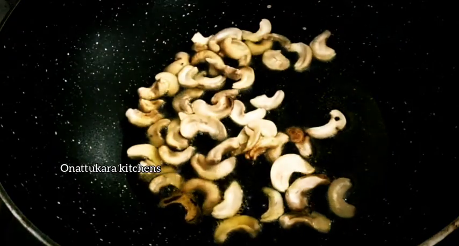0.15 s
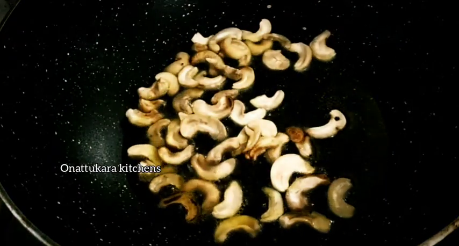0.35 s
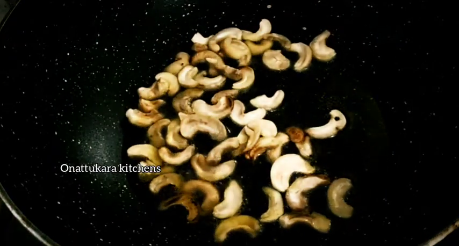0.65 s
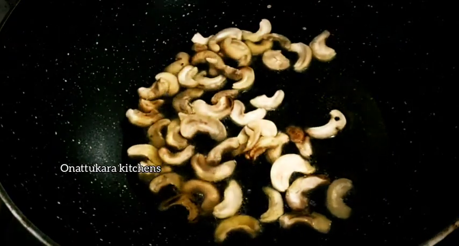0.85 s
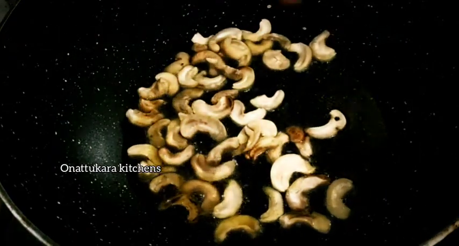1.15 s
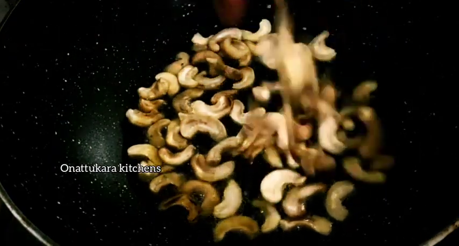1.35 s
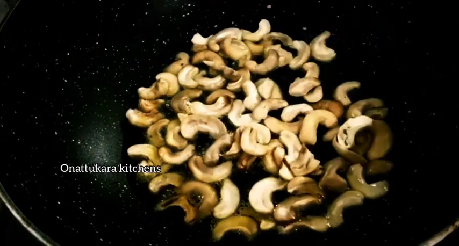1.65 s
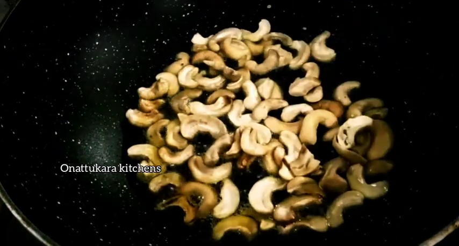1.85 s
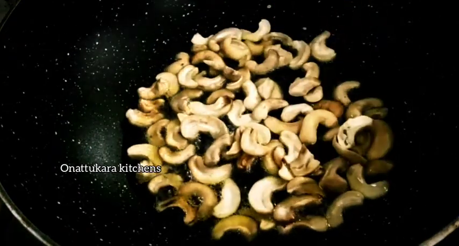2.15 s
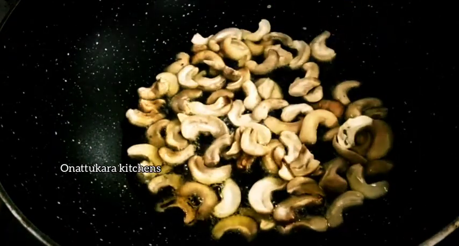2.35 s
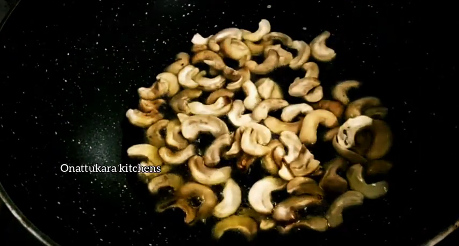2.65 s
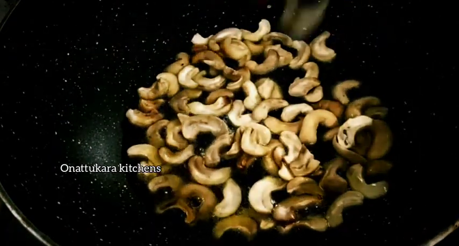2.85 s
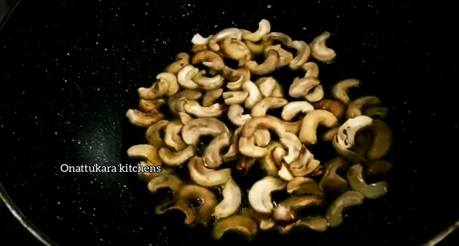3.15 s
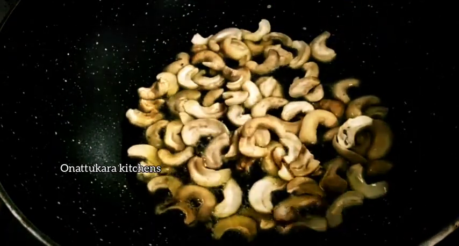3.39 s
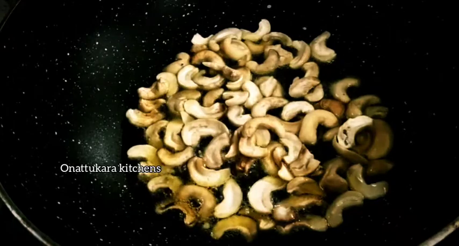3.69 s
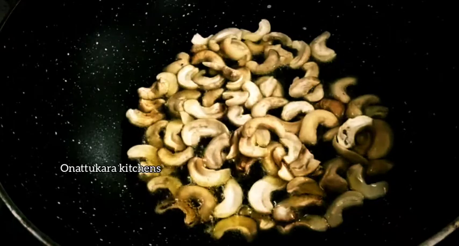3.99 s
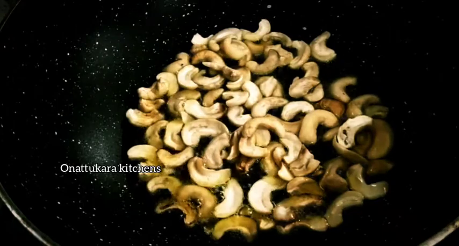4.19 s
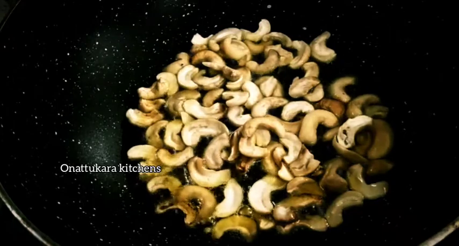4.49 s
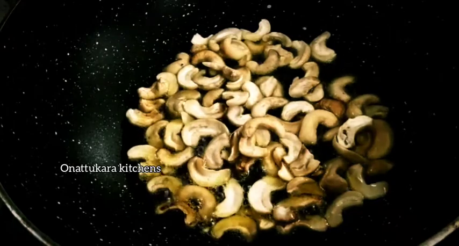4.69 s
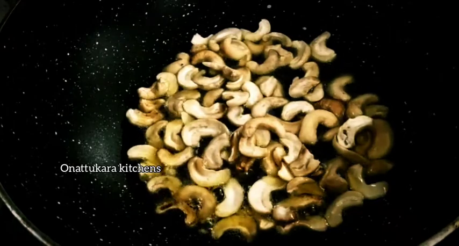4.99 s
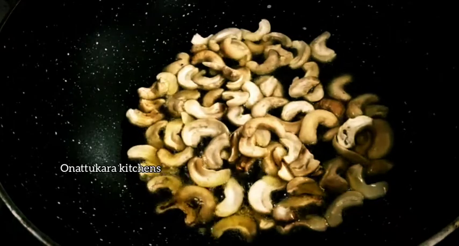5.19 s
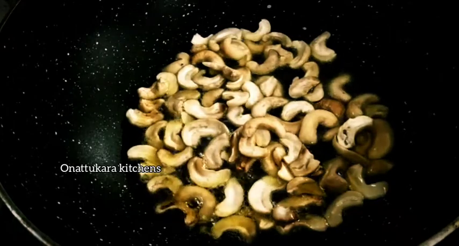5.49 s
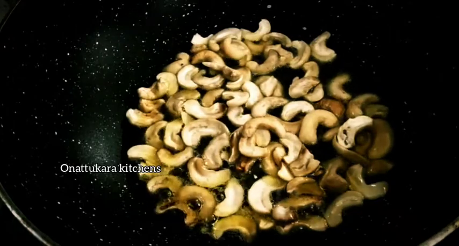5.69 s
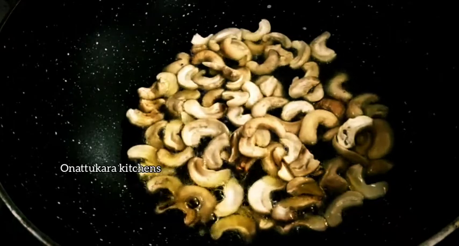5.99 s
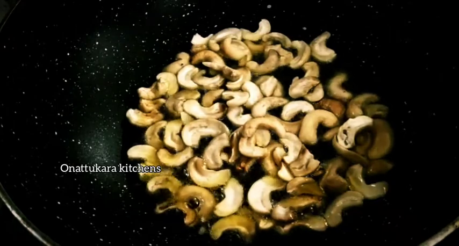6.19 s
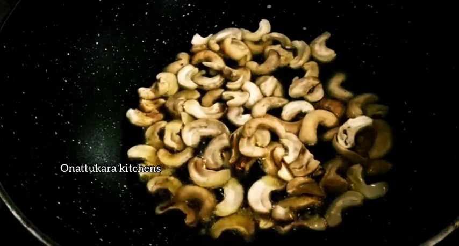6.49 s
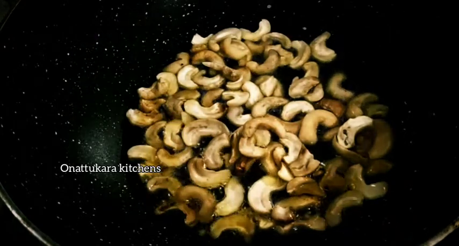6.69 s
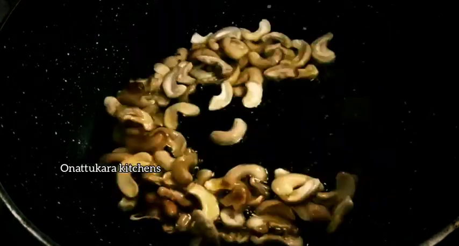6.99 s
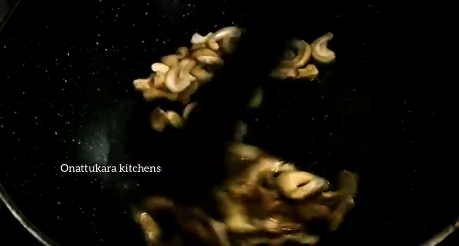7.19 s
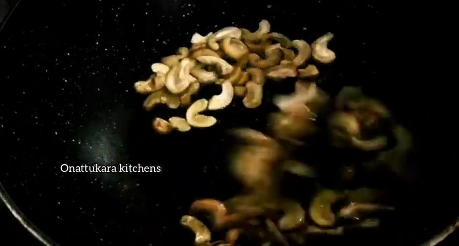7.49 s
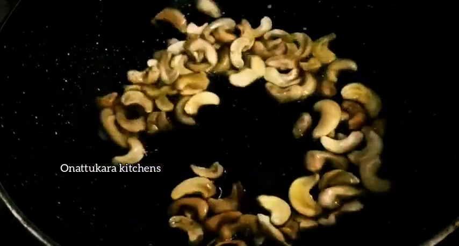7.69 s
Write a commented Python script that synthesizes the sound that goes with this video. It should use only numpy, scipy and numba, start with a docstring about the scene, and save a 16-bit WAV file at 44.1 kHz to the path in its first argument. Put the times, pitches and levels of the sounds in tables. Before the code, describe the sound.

Cashews sizzle and crackle steadily in hot fat, a fresh handful patters in, utensils clatter nearby, then a spatula knocks the pan and stirs.

```python
"""Cashews fry in ghee in a nonstick pan, heard from close above in a small, hard kitchen through a phone microphone.
Steam bubbles burst in the fat as damped tones: fine fizz, coarser crackle and single pops, with rough sputters.
A fresh handful drops in and the fizz flares; later a spatula knocks on the pan and turns the nuts.
Metal utensils clatter beside the stove: runs of tiny contacts that excite ringing modes."""
import sys
import numpy as np
from scipy import signal
from scipy.fft import rfft, irfft
from scipy.io import wavfile
from scipy.ndimage import uniform_filter1d
from numba import njit

SR = 44100
rng = np.random.default_rng(int(sys.argv[2]) if len(sys.argv) > 2 else 0)


def int16_out(signal):
    """Quantize to a 16-bit WAV file."""
    q = np.round(np.clip(np.atleast_2d(signal).T, -1, 1) * 32767)
    wavfile.write(sys.argv[1], SR, q.astype(np.int16))


N = 346185
TIME = np.arange(N) / SR

# wet surfaces meet hot fat as nuts drop in or are turned; both changes are scaled by a swell that stays below 1:
# (time [s], crackle change [dB], fizz change [dB], time for the fizz to subside [s])
FLARES = [(-0.12, -6, 9, 0.16), (1.21, 12, 16, 0.37), (6.82, -4, 7, 1.14), (7.33, 23, 6.5, 1.7)]
FLARE_RISE_S = 0.11  # for the fizz
CRACKLE_SLOWNESS = 6.3  # the crackle swells and subsides this many times slower
# the fat left to itself: levels at the start, sinking as the nuts dry
CRACKLE_DB, CRACKLE_DRYING_DB_PER_S = -48, 0.58
FIZZ_DB, FIZZ_DRYING_DB_PER_S = -42, 0.74
# spectra of crackle and fizz: (frequency [Hz], gain [dB])
CRACKLE_COLOUR = [(50, -53), (150, -53), (260, -4.5), (480, -10), (620, 1.5), (900, -1), (1100, -2.5),
                  (1400, 1.5), (2200, 4.5), (3500, 0), (6000, 13)]
FIZZ_COLOUR = [(80, -57.5), (400, -9.5), (1500, -1), (3000, -3.5), (5000, -5.5), (6600, 0), (7800, 3),
               (15000, 13.5)]

# the loudest bursting bubbles, before trim and colour: (time [s], level [dB], pitch [Hz], decay [ms])
POPS = [(0.022, -24, 6500, .8), (0.0565, -25, 6460, .6), (0.0722, -25, 6720, .5), (0.1177, -25, 3870, .3),
        (0.1533, -25, 2410, .7), (0.262, -27, 7230, .5), (0.3035, -26, 4560, .6), (0.335, -27, 3150, .85),
        (0.443, -23.5, 5700, .8), (0.5051, -23, 4220, .6), (0.543, -32, 1590, 1.5), (0.5445, -22, 6460, .5),
        (0.604, -27.5, 3200, 1.2), (0.6425, -26, 6000, 1.1), (0.692, -30, 1360, 1.1),
        (0.736, -23, 6030, .6), (0.8415, -25, 6890, .7), (0.9392, -26, 3360, .8), (0.979, -30, 1280, 2.2),
        (1.0312, -24, 6600, .9), (1.063, -25, 6800, .5), (1.0788, -25.5, 3120, .77), (1.11, -31, 1370, 2.2),
        (1.2557, -25, 6900, 1.3), (1.338, -23.5, 7000, .8), (1.4675, -22, 3260, 1.1),
        (1.474, -26, 2950, 1.6), (1.597, -24, 4300, .8), (1.7386, -25, 7050, .7), (1.8017, -22, 6720, .6),
        (1.841, -23.5, 4400, .9), (1.861, -23, 3500, .3), (1.8843, -24, 3800, .95), (1.9465, -24, 2070, .9),
        (2.0395, -24, 6530, .6), (2.1388, -24, 2500, .6), (2.3239, -26, 2150, .7), (2.383, -25, 1980, 1.2),
        (2.4266, -24, 3870, .4), (2.4373, -24, 3700, 1.2), (2.4793, -25.5, 2020, 2.1),
        (2.6176, -24, 1840, 1.9), (2.6888, -24, 1380, 1.3), (2.7108, -25, 5600, .5),
        (2.7248, -25, 1890, 2.5), (2.764, -26, 6580, 1.3), (2.7858, -22, 7300, 1), (2.8066, -27, 1980, 1.5),
        (2.815, -25.5, 2030, 2.5), (2.9102, -23, 6030, .5), (3.0222, -19, 2630, 1),
        (3.077, -19.5, 1700, .9), (3.1642, -25, 1940, 1.4), (3.1918, -26, 4270, .8),
        (3.254, -26, 2200, 2.2), (3.348, -14.5, 1760, 1.2), (3.4575, -26, 1980, 1), (3.505, -23, 4130, 1),
        (3.5402, -23, 4650, .5), (3.571, -24, 1840, .97), (3.6171, -25, 3870, .6), (3.6493, -23, 3780, .4),
        (4.0433, -23, 6370, .5), (4.129, -22, 2650, .9), (4.2926, -26, 4910, .7), (4.3483, -24.5, 3440, .6),
        (4.3781, -29, 1890, 2.2), (4.4996, -27, 2070, 1.4), (4.5907, -25, 4150, .5),
        (4.7303, -26, 7320, .7), (4.7879, -26, 2320, .6), (4.8194, -25, 1750, 2), (5.2776, -23.5, 4080, .6),
        (5.3702, -24.5, 7660, .6), (5.4131, -28, 7230, .7), (5.4485, -22, 2150, .8),
        (5.4558, -25, 2320, .6), (5.511, -23.5, 3760, .6), (5.5626, -26, 7580, .5),
        (5.678, -23.5, 6500, .25), (5.7302, -19.5, 4600, .6), (5.7751, -25, 7410, .3),
        (5.8743, -26, 5080, .5), (5.9393, -26.5, 1810, .8), (6.02, -25, 3500, .25), (6.1712, -21, 2770, .6),
        (6.2842, -21.5, 3470, .4), (6.3179, -25, 2580, .8), (6.4474, -22.5, 2390, .8),
        (6.5529, -24, 4560, .5), (6.8819, -26, 4220, .8), (7.0333, -21, 4700, 1.3), (7.0975, -26, 5850, .7),
        (7.184, -23, 4200, .9), (7.199, -21, 4400, .7), (7.2115, -25, 3870, 1.6), (7.3082, -21.5, 5070, .8),
        (7.4163, -20, 6000, .7), (7.5554, -24, 7260, .8), (7.579, -21, 3500, .25),
        (7.622, -21.5, 7300, 1.1), (7.697, -22, 3850, 1.7), (7.7124, -21, 5340, .7), (7.738, -23, 3790, .6)]
# spectrum of the pops: (frequency [Hz], gain [dB])
POP_COLOUR = [(50, -30), (200, -25), (650, 0), (8000, 0), (12000, 7)]
POP_TRIM_DB = -.9
# lesser pops at random: level above the crackle, range of pitch, typical decay
STRAY_DB, STRAY_SPREAD_DB = 14.5, 4
STRAY_LOW_HZ, STRAY_HIGH_HZ, STRAY_DECAY_MS = 2400, 7000, .55

# nuts pattering down and the spatula's edge tapping, before the low cut:
# (time [s], level [dB], pitch [Hz], decay [ms])
CLACKS = [(1.2045, -33, 870, 5.3), (1.244, -28, 1580, 2.6), (1.258, -28, 980, 4.3), (1.333, -31, 960, 7.6),
          (1.355, -30, 970, 4), (6.6895, -26.5, 990, 2.3)]
# nuts landing and the spatula striking the pan: (time [s], peak level [dB], contact brightness [Hz])
KNOCKS = [(1.206, -39, 600), (1.217, -26, 6000), (1.232, -38, 400), (6.689, -23, 826), (6.76, -26.5, 450),
          (7.0392, -13, 1870), (7.149, -23, 1030), (7.388, -31, 2500), (7.394, -35.5, 130),
          (7.445, -36.5, 200)]
# modes of the pan: (frequency [Hz], level [dB], t60 [s])
PAN_MODES = [(161, -17, .35), (232, -12, .45), (258, -8, .8), (267, -8, .8), (328, -4.5, .55),
             (413, -14, .3), (554, -15, .3), (625, -2, .55), (745, -10, .55), (795, -6, .5), (831, -7, .5),
             (908, -8, .5), (965, -6, .55), (1017, -3, .6), (1160, -12, .4), (1367, -9, .35),
             (1520, -11, .35), (1920, -7, .35), (2140, -11, .3)]
# spectrum of a blow on the pan: (frequency [Hz], gain [dB])
THUD_COLOUR = [(30, -52), (60, -22), (130, -12.5), (250, -4.5), (500, 3.5), (750, 1), (1000, -3.5),
               (1400, 5.5), (2000, -5), (2800, -18), (6000, -5)]
# hollow note of a blow, and the pan's ringing; levels relative to the thud
BLOW_HZ, BLOW_T60_S, BLOW_DB, PAN_RING_DB = 850, .028, -2.5, -2.5
# spatula and nuts sliding over the pan floor: (time [s], level [dB], pitch [Hz], length [s])
SLIDES = [(1.218, -37, 2100, 0.0089), (1.25, -48, 970, 0.12), (6.689, -42, 310, 0.03),
          (6.73, -44, 342, 0.09), (6.689, -42, 1970, 0.021), (6.75, -45.5, 2130, 0.031),
          (7.05, -45, 990, 0.17), (7.186, -42, 4230, .022), (7.21, -51.5, 263, 0.13),
          (7.362, -45.5, 2330, 0.029)]
# short rough sputters around one pitch, and the lingering tail of the loudest pop:
# (time [s], level [dB], pitch [Hz], length [s])
SPUTTERS = [(2.275, -46, 2270, 0.027), (2.388, -45, 1900, 0.018), (2.69, -47, 1393, 0.013),
            (2.728, -59, 2090, 0.0051), (2.90, -43.5, 920, .028), (3.078, -40, 1330, 0.0083),
            (3.349, -48, 1430, 0.13), (4.819, -39.5, 1610, 0.026), (4.863, -39, 1570, 0.0087),
            (5.449, -47.5, 1558, 0.021), (5.836, -41, 1530, 0.028), (6.228, -39, 864, 0.0091)]

# utensils beside the stove collide in short runs and settle in longer, faint ones, before gain and colour:
# (time [s], level [dB], length, at most half a second [s], treble [dB], low cut [Hz])
CLATTERS = [(3.71, -37.5, 0.011, 3, 300), (3.722, -30, 0.017, -17, 220), (3.738, -34.5, .014, -16, 250),
            (3.766, -52.5, 0.33, 7, 300), (4.463, -37, 0.016, -10, 300), (4.488, -52.5, .74, -0.5, 400),
            (4.873, -33, 0.014, 6, 60), (4.886, -37.5, 0.031, 2, 60), (4.91, -32.5, 0.03, -2, 90),
            (4.946, -29, 0.0089, -0.5, 200), (4.961, -32.5, 0.024, -2, 200), (5.0, -42.5, .16, -5, 500)]
# modes of the utensils: (frequency [Hz], level [dB], t60 [s])
UTENSIL_MODES = [(158, -9, .6), (385, -8, .4), (415, -6, .55), (470, -7, .4), (628, -11, .4), (791, -4, .6),
                 (1066, -4, .45), (1166, -7, .45), (1513, 0, .6), (1831, -4, .6), (2519, -2, .5),
                 (2902, -1, .5), (3480, -1, .6), (3682, 0, .55), (4705, -2, .4), (5410, -1, .45),
                 (6175, -2, .4), (7117, 3, .35), (7400, 2, .35), (7670, 3, .3), (7838, 2, .3),
                 (8710, 9, .5), (9690, 7, .4), (12900, 10, .2), (14900, 10, .25)]
# modes of the worktop under them: (frequency [Hz], level [dB], t60 [s])
WORKTOP_MODES = [(158, -4.5, 0.51), (190, -5, 0.25)]
WORKTOP_DB = -32
# spectrum of the clatter: (frequency [Hz], gain [dB])
CLATTER_COLOUR = [(30, -26), (110, -26), (160, -9.5), (200, -12), (245, -5), (320, -5.5), (400, 0),
                  (470, -1), (520, -3), (640, -1), (850, -4.5), (1120, -2), (1330, -1.5), (1550, -3.5),
                  (2300, -7), (8000, -10), (15000, -16)]
# nudges of the bowl: (time [s], peak level [dB])
BOWL_TAPS = [(3.725, -39), (4.465, -36)]
# modes of a steel bowl, before a linear fade over one second: (frequency [Hz], level [dB], t60 [s])
BOWL_MODES = [(377, -10, .8), (1071, 0, 1.5), (1168, -6, 1.5), (1480, -9, 1.5), (1809, -7, 1.6),
              (2649, -7, 1.4), (3456, -3, 2.2)]
# short pitched rattles within the clatter: (time [s], level [dB], pitch [Hz], length [s])
PITCHED_RATTLES = [(3.73, -47.5, 1130, 0.077), (3.74, -40.5, 637, 0.014), (4.465, -45.5, 654, 0.022),
                   (4.876, -40, 399, 0.028)]

# spectrum of the quiet kitchen: (frequency [Hz], gain [dB])
KITCHEN_COLOUR = [(25, -24), (50, -9), (80, 0), (110, -2.5), (200, -6.5), (300, 3), (1000, -7),
                  (15000, -36)]
# response of the microphone: (frequency [Hz], gain [dB])
MICROPHONE = [(20, -6.5), (7700, 4), (8300, -2), (9000, -8.5), (10300, -17.5), (12000, -25.5), (15500, -26)]
TOP_HZ = 15700  # upper edge of the recorded band


def undb(db):
    """Amplitude of a level in dB."""
    return 10 ** (np.asarray(db) / 20)


def unit(x):
    """Scale to rms 1."""
    return x / np.sqrt(np.mean(x ** 2))


def add(track, s, sound):
    """Mix a sound into a track at time s."""
    i = int(s * SR)
    track[i:i + len(sound)] += sound[:N - i]


def colour(x, points, size=4096):
    """Causal filter with the given (Hz, dB) spectrum, built from its cepstrum."""
    hz, db = np.transpose(points)
    bins = np.maximum(np.arange(size // 2 + 1) * SR / size, 1)
    gain_db = np.interp(np.log(bins), np.log(hz), db)
    cepstrum = irfft(np.log(undb(gain_db)))
    # folding the cepstrum forward in time makes the filter minimum-phase
    cepstrum[1:size // 2] *= 2
    cepstrum[size // 2 + 1:] = 0
    impulse = irfft(np.exp(rfft(cepstrum)))
    return signal.fftconvolve(x, impulse)[:len(x)]


def lowpass(x, hz):
    """Gentle two-pole low-pass."""
    return signal.sosfilt(signal.butter(2, min(hz, SR / 2 - 1), fs=SR, output="sos"), x)


def fade(t, t60):
    """Exponential decay, 60 dB in t60 seconds."""
    return np.exp(-np.log(1000) * t / t60)


def ring(modes):
    """One second of an object's free ringing, with unit energy."""
    t = TIME[:SR]
    y = np.zeros(SR)
    for hz, db, t60 in modes:
        y += undb(db) * fade(t, t60) * np.sin(2 * np.pi * (hz * t + rng.random()))
    return y / np.sqrt(np.sum(y ** 2))


@njit
def bubbles(when, size, hz, decay, snap):
    """Each bubble is a snap of its film and a damped tone of its cavity."""
    out = np.zeros(N)
    for k in range(len(when)):
        start = int(when[k] * SR)
        # z is a decaying phasor, turned by p at each sample
        z, p = size[k] + 0j, np.exp((2j * np.pi * hz[k] - 1 / decay[k]) / SR)
        for i in range(max(start, 0), min(N, start + int(6 * decay[k] * SR))):
            out[i] += z.imag + (snap[k] * size[k] if i == start else 0.)
            z *= p
    return out


def burst(when, size, hz, decay, snap):
    """Bubbles and their echoes off the pan wall, whose delay depends on where each one sits."""
    lag = 0.000965 + .004 * rng.random(len(when))
    direct = bubbles(when, size, hz, decay, snap)
    return direct + undb(-10) * bubbles(when + lag, size, hz, decay, snap)


def swarm(count, low_hz, high_hz, spread_db, cap_db, cycles, snap):
    """Bubbles at random moments: many tiny, few large, each ringing for a few cycles."""
    when, pitch, rank, damping, film = rng.random((count, 5)).T
    hz = low_hz * (high_hz / low_hz) ** pitch
    size = undb(-spread_db * np.log(1 - rank))
    size /= np.hypot(1, size / undb(cap_db))  # a shallow film of fat limits how large they grow
    decay = cycles * 2 ** (2 * damping - 1) / hz
    size /= np.sqrt(decay / decay.mean())  # shorter tones start stronger
    return burst(when * N / SR, size, hz, decay, snap * (.5 + 2 * film))


def surge(rate):
    """Random levels held 1 / rate s and smoothed; spread near 1."""
    hold = int(SR / rate)
    steps = np.repeat(rng.standard_normal(N // hold + 1), hold)
    return 1.2 * uniform_filter1d(steps, hold)[:N]


def swell(age, subside_s):
    """Shape of a flare: a quick rise, then a slower exponential fall."""
    return (1 - np.exp(-age / FLARE_RISE_S)) * np.exp(-age / subside_s)


def boil(t):
    """Levels of crackle and fizz in dB at times t: a slow drying out, and changes when nuts drop in or are turned."""
    crackle_db = CRACKLE_DB - CRACKLE_DRYING_DB_PER_S * t
    fizz_db = FIZZ_DB - FIZZ_DRYING_DB_PER_S * t
    for s, crackle_change_db, fizz_change_db, subside_s in FLARES:
        age = np.maximum(t - s, 0)
        crackle_db = crackle_db + crackle_change_db * swell(age / CRACKLE_SLOWNESS, subside_s)
        fizz_db = fizz_db + fizz_change_db * swell(age, subside_s)
    return crackle_db, fizz_db


def sizzle():
    """Coarse crackle around the nuts, fine fizz over the whole film of fat, and a soft hiss of steam."""
    crackle_db, fizz_db = boil(TIME)
    crackle = swarm(count=6000, low_hz=741, high_hz=4466, spread_db=4.0, cap_db=18, cycles=2.8, snap=0.78)
    fizz = swarm(count=12000, low_hz=3310, high_hz=8310, spread_db=3.8, cap_db=21, cycles=2.4, snap=0.5)
    steam = undb(-17) * rng.standard_normal(N)
    coarse = unit(colour(crackle, CRACKLE_COLOUR)) * undb(crackle_db)
    fine = unit(colour(unit(fizz) + steam, FIZZ_COLOUR)) * undb(fizz_db)
    # moisture leaves the nuts in quick, uneven flurries
    flurry_db = .7 * surge(30) + .8 * surge(14)
    return (coarse + fine) * undb(flurry_db)


def hush():
    """The quiet kitchen behind it all: faint steady noise, mostly low."""
    return undb(-67.0) * unit(colour(rng.standard_normal(N), KITCHEN_COLOUR))


def room(x):
    """Dense reflections from tiles and cupboards; they build up briefly, and the treble dies first."""
    t, noise = TIME[:SR], rng.standard_normal(SR)
    low = lowpass(noise, 3500)
    decaying = low * fade(t, .66) + (noise - low) * fade(t, .5)
    tail = decaying * (1 - fade(t, .03))
    return signal.fftconvolve(x, tail / np.sqrt(np.sum(tail ** 2)))[:N]


def stray_pops(count):
    """Rows like POPS at random moments, their level following the crackle."""
    when, pitch, size, damping = rng.random((count, 4)).T
    s = when * TIME[-1]
    db = boil(s)[0] + STRAY_DB + STRAY_SPREAD_DB * (2 * size - 1)
    hz = STRAY_LOW_HZ * (STRAY_HIGH_HZ / STRAY_LOW_HZ) ** pitch
    return np.column_stack([s, db, hz, STRAY_DECAY_MS * 2 ** (2 * damping - 1)])


def pops():
    """Large single bubbles that stand out of the sizzle, each with a tiny spit of steam."""
    s, db, hz, ms = np.vstack([POPS, stray_pops(count=24)]).T.copy()
    out = burst(s, undb(db), hz, ms / 1000, np.full(len(s), .7))
    t = TIME[:SR // 100]
    for start, pop_db in zip(s, db):
        spit = rng.standard_normal(len(t)) * fade(t, 0.0025)
        add(out, start, undb(pop_db - 8.5) * spit)
    return undb(POP_TRIM_DB) * colour(out, POP_COLOUR)


def clacks():
    """Nuts and spatula tap the pan floor, each with a brief hollow note."""
    s, db, hz, ms = np.array(CLACKS).T.copy()
    notes = bubbles(s, undb(db), hz, ms / 1000, np.zeros(len(s)))  # damped tones without a snap
    return signal.sosfilt(signal.butter(2, 500, "high", fs=SR, output="sos"), notes)


def knocks():
    """A blow gives a dull thud, a short hollow note and the pan's ringing; softer contact keeps only the lows."""
    t = TIME[:SR]
    thud = colour(signal.unit_impulse(SR), THUD_COLOUR)
    note = fade(t, BLOW_T60_S) * np.cos(2 * np.pi * BLOW_HZ * t)
    # the ringing takes a moment to spread from the point of contact
    ringing = ring(PAN_MODES) * (1 - fade(t, .02))
    response = unit(thud) + undb(BLOW_DB) * unit(note) + undb(PAN_RING_DB) * unit(ringing)
    out = np.zeros(N)
    for s, db, contact_hz in KNOCKS:
        blow = lowpass(response, contact_hz)
        add(out, s, undb(db) * blow / np.abs(blow).max())
    return out


def rattle(length, spread_db):
    """A run of tiny uneven impulses, at most half a second, swelling quickly and dying away."""
    n = min(int(length * SR), SR // 2)
    chance = rng.standard_normal((2, SR // 2))[:, :n]
    along = np.linspace(0, 1, n)
    impulses = chance[0] * undb(spread_db * chance[1])
    return unit(impulses * along ** 0.12 * (1 - along) ** .5)


def rasps(table, sharpness):
    """Runs of tiny uneven impulses, each ringing one broad resonance."""
    out = np.zeros(N)
    for s, db, hz, length in table:
        b, a = signal.iirpeak(hz, sharpness, fs=SR)
        run = np.pad(rattle(length, spread_db=9.0), (0, SR // 50))  # room to ring out
        y = signal.lfilter(b, a, signal.lfilter(b, a, run))
        add(out, s, undb(db) * y * np.sqrt(length * SR / np.sum(y ** 2)))
    return out


def slides():
    """Spatula and nuts slide over the pan floor, a rasp of tiny contacts."""
    return rasps(SLIDES, sharpness=4.6)


def sputters():
    """Short rough sputters around one pitch, and the lingering tail of the loudest pop."""
    return rasps(SPUTTERS, sharpness=3.8)


def utensils():
    """Metal pieces chatter against each other and ring faintly, with a low boom of the worktop."""
    contacts = np.zeros(N)
    for s, db, length, treble_db, low_cut_hz in CLATTERS:
        low_cut = signal.butter(1, low_cut_hz, "high", fs=SR)
        run = signal.lfilter(*low_cut, rattle(length, spread_db=3.5))
        body = signal.lfilter(*signal.butter(1, 2200, fs=SR), run)
        add(contacts, s, undb(db + 9.5) * (body + undb(treble_db) * (run - body)))
    metal = undb(-11) * signal.fftconvolve(contacts, ring(UTENSIL_MODES))[:N]
    boom = undb(WORKTOP_DB) * signal.fftconvolve(contacts, ring(WORKTOP_MODES))[:N]
    return colour(contacts + metal, CLATTER_COLOUR) + boom


def bowl():
    """A steel bowl among the utensils is nudged and sings on faintly in its own modes."""
    out, note = np.zeros(N), ring(BOWL_MODES) * (1 - TIME[:SR])
    for s, db in BOWL_TAPS:
        add(out, s, undb(db) * note / np.abs(note).max())
    return out


def pitched_rattles():
    """Short pitched rattles within the clatter, each around one broad resonance."""
    return rasps(PITCHED_RATTLES, sharpness=5.6)


def scene():
    """The pan close by, the utensils beside it and the kitchen around them, the same in both channels."""
    sizzling = sizzle()
    popping = pops() + sputters()
    stirring = knocks() + clacks() + slides()
    clatter = utensils() + pitched_rattles()
    # each source has its own reflections; the utensils are further off, so more of their sound comes by the walls
    walls = room(undb(-8.0) * sizzling) + room(undb(-8.5) * popping)
    walls += room(undb(-8.0) * stirring) + room(clatter)
    mono = sizzling + popping + stirring + clatter + bowl() + walls + hush()
    return np.array([mono, mono])


def record(dry):
    """A phone microphone whose treble falls away above 8 kHz and ends steeply at the top of the band."""
    heard = np.array([colour(channel, MICROPHONE) for channel in dry])
    return signal.sosfilt(signal.ellip(10, .2, 70, TOP_HZ, fs=SR, output="sos"), heard)


dry = scene()
out = record(dry)
int16_out(out)
```